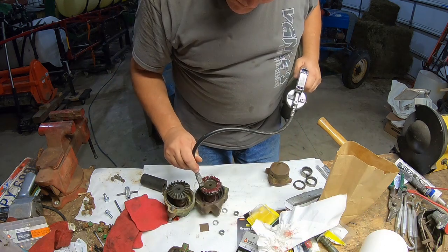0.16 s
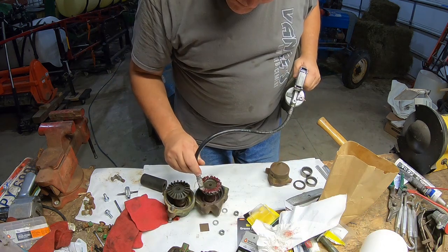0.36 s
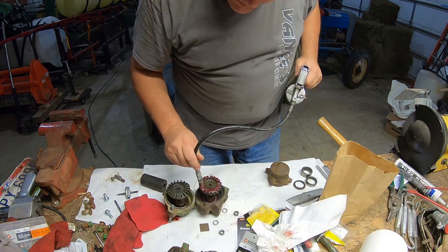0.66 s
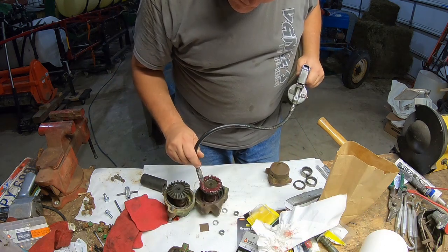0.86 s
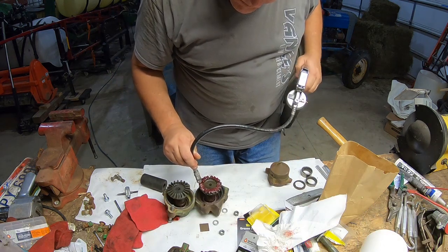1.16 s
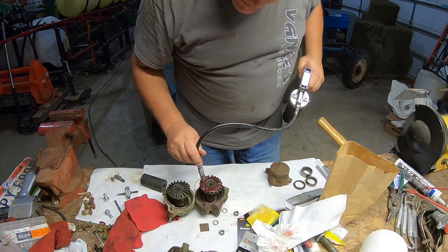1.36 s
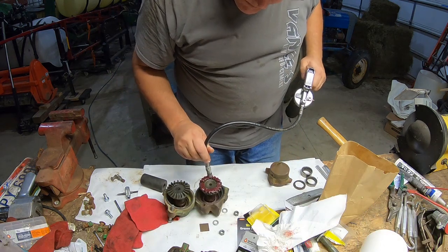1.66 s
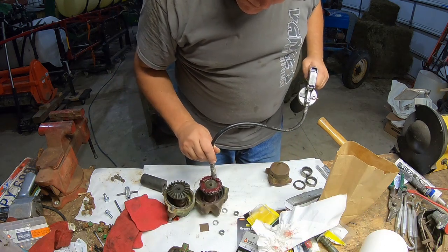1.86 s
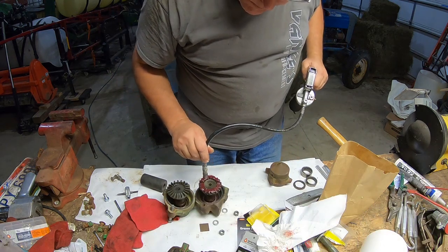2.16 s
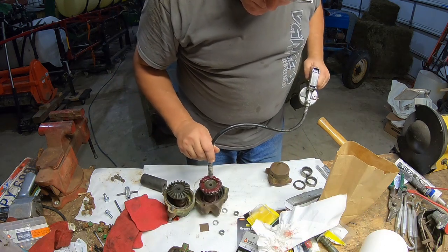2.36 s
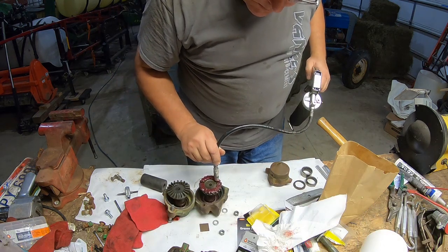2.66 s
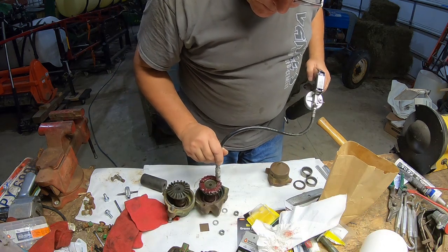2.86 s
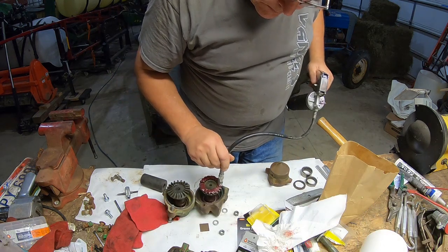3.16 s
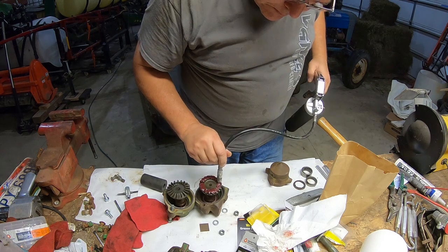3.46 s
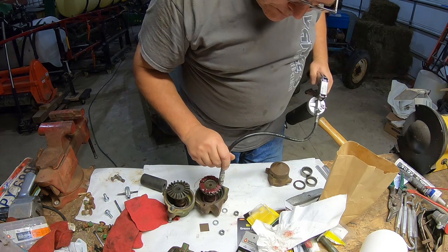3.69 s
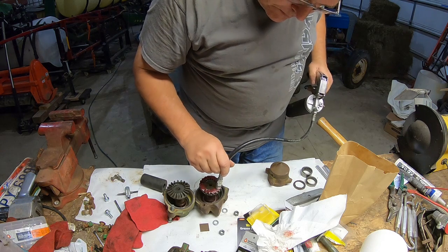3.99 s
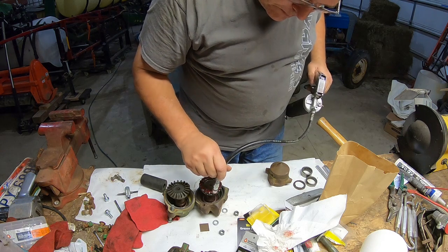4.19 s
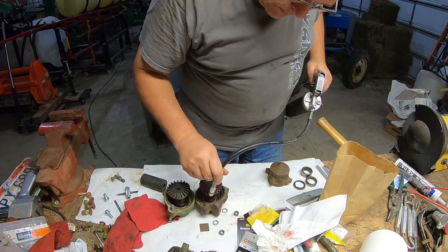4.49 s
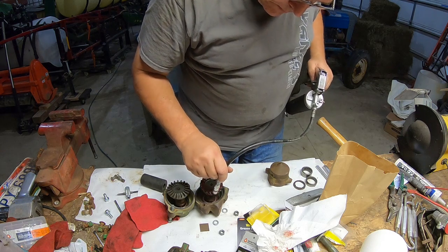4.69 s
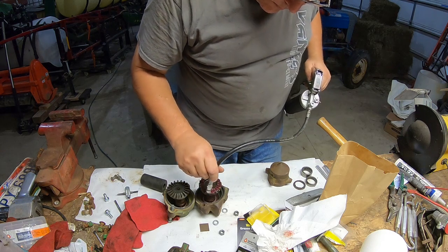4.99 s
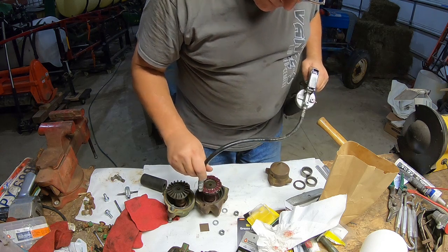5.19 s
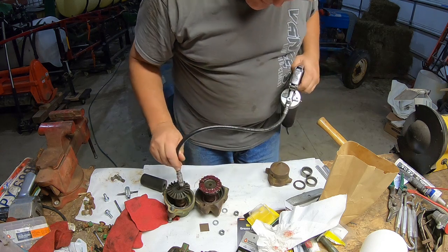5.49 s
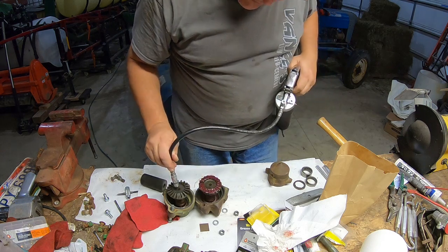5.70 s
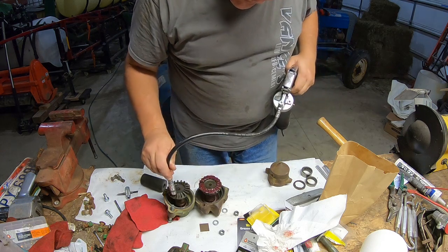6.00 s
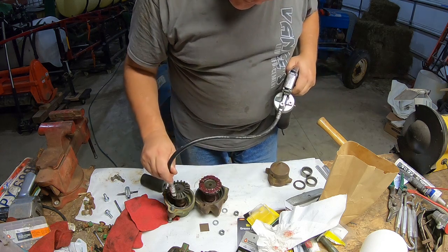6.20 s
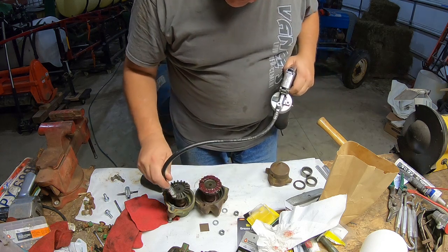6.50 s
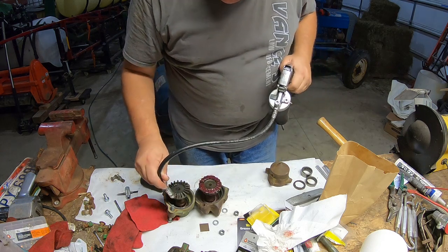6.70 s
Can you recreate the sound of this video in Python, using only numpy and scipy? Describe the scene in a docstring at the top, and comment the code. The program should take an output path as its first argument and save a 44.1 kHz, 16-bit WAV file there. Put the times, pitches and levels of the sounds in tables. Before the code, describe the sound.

A hand grease gun is worked in short strokes, its metal lever scraping, juddering and squeaking brightly, over quiet room rumble and a growing engine tone.

```python
"""A hand grease gun is pumped in a workshop: its steel lever and plunger scrape, judder and slip in short strokes.
Rough friction noise, broken into slips, rings the barrel, spring, head, lever and rod through bending resonances.
Small snaps, squeaks, ticks, thumps and a thin hiss join in. Two unsteady low tones and a growl make an engine
outside, over the room's quiet hiss and rumble of filtered noise. Two microphone ports listen."""
import sys
import numpy as np
from scipy import signal
from scipy.fft import rfft, irfft, next_fast_len
from scipy.io import wavfile
from scipy.ndimage import uniform_filter1d, map_coordinates

SR = 44100
rng = np.random.default_rng(int(sys.argv[2]) if len(sys.argv) > 2 else 0)


def wav_out(sig):
    """Save sig, one row per channel (or a flat mono array), as 16-bit PCM at SR to the path in sys.argv[1]."""
    wavfile.write(sys.argv[1], SR, np.round(np.clip(np.atleast_2d(sig).T, -1, 1) * 32767).astype(np.int16))


N = 302085  # length in samples
T = np.arange(N) / SR  # time in seconds


def amp(db):
    """Gain of a level in dB."""
    return 10 ** (np.asarray(db) / 20)


def unit(x):
    """x scaled to an rms of 1."""
    return x / np.sqrt(np.mean(np.abs(x) ** 2) + 1e-20)


def noise(size=N):
    """Two unrelated channels of white noise."""
    return rng.standard_normal((2, size))


def along(points, hz):
    """Read (pitch_hz, value) points at any pitch, on a log axis."""
    point_hz, values = np.transpose(points)
    return np.interp(np.log(hz + 1), np.log(point_hz + 1), values)


def curves(rows, t=T):
    """Draw straight lines over time through each column after the first, which holds the times."""
    times, *columns = np.transpose(rows)
    return np.array([np.interp(t, times, column) for column in columns])


def wobble(rate, size=N):
    """A smooth random curve with about rate random points a second."""
    knots = rng.standard_normal(int(size * rate / SR) + 4)
    return map_coordinates(knots, [np.arange(size) * rate / SR])


def filtered(x, response):
    """Multiply the spectrum of x by a response, given as a function of frequency."""
    padded = next_fast_len(N + SR // 2)
    hz = np.fft.rfftfreq(padded, 1 / SR)
    return irfft(rfft(x, padded) * response(hz), padded)[..., :N]


def resonances(modes):
    """Response of fixed resonances (pitch_hz, width_hz, level_db), scaled so white noise keeps its level."""
    def response(f):
        total = 0
        for k, (hz, width, db) in enumerate(modes):
            peak = 1j * f * width / (hz * hz - f * f + 1j * f * width)
            total = total + (-1) ** k * amp(db) * peak  # alternate signs
        return unit(total)
    return response


def moving(x, hz, width_hz):
    """A resonance whose pitch follows hz: shift down, one pole, shift back; white noise keeps its level."""
    turn = np.exp(2j * np.pi * np.cumsum(hz) / SR)
    pole = np.exp(-np.pi * width_hz / SR)
    return np.real(turn * signal.lfilter([np.sqrt(2 - 2 * pole ** 2)], [1, -pole], x / turn))


def ports(pair, alike):
    """Mix two unrelated signals to left and right so that they share the given likeness at each pitch."""
    def shares(hz):
        angle = np.arccos(np.clip(along(alike, hz), -1, 1)) / 2
        return np.array([np.cos(angle), np.sin(angle)])
    mid, side = filtered(pair, shares)
    return np.array([mid + side, mid - side])


def burst(size, rise, t60):
    """Force of one slip: a quick rise, then a decay (60 dB in t60 seconds) as the metal grips again."""
    t = np.arange(size) / SR
    return (1 - np.exp(-t / rise)) * amp(-60 * t / t60)


# Tone colour of the hiss: pitch_hz, relative level_db (per Hz)
HISS_COLOUR = [(180, -49), (300, -7), (535, -12.5), (1160, -15.5), (2040, -15.5), (15500, -40)]
# Tone colour of the low rumble: pitch_hz, relative level_db (per Hz)
RUMBLE_COLOUR = [(15, -49), (25, -3.5), (76, -8.5), (184, 0), (241, -6), (420, -18), (550, -41.5),
                 (920, -120)]
# How alike the background is at the two ports: pitch_hz, likeness (-1 to 1)
ROOM_LIKENESS = [(60, 0.22), (130, 0.61), (290, -0.74), (640, -0.61), (3100, 0.52), (6000, 0.045)]


def room():
    """The workshop's steady hiss over a lumpy rumble, both coloured noise whose level sways at random."""
    def layer(colour):
        coloured = filtered(noise(), lambda hz: amp(along(colour, hz)))
        return unit(ports(coloured, ROOM_LIKENESS))
    hiss = amp(-61.5 + 1 * wobble(1.86)) * layer(HISS_COLOUR)
    rumble_db = -56.0 + .6 * wobble(2.99) + 3.83 * wobble(10)  # slow sway plus quicker lumps
    rumble = amp(rumble_db) * layer(RUMBLE_COLOUR) * amp([[-.9], [.9]])  # a little louder on the right
    return hiss + rumble


# Swells of the lower engine tone: time_s, level_db (a random sway is added)
BOOM = [(0, -75.5), (2.1, -60.5), (2.28, -59), (3.67, -49.5), (3.73, -36), (3.79, -68), (3.89, -44),
        (4.65, -36.5), (4.73, -55), (5.29, -32), (5.49, -35), (5.54, -47), (6.12, -32.5), (6.28, -60.5),
        (6.36, -29), (6.5, -49), (6.66, -33.5), (6.85, -40)]
# The higher engine tone: time_s, pitch_hz (a random drift is added), level_db
DRONE_TONE = [(2.5, 96.7, -59), (4.5, 96.8, -54), (5.3, 101, -42), (5.7, 108.9, -48), (6.1, 108.3, -39),
              (6.25, 114.9, -50.5), (6.37, 116.6, -43), (6.66, 116.8, -35.5), (6.85, 113.7, -50)]


def engine():
    """Two unsteady low tones, each blurred by noise around its pitch, over a wide growl that follows the boom."""
    boom_db, = curves(BOOM)
    drone_hz, drone_db = curves(DRONE_TONE)
    boom_tone = (boom_db + 2 * wobble(8.6), 74, 1.5, .5)  # level dB, pitch Hz, drift Hz, blur
    drone_tone = (drone_db, drone_hz, 2.5, .8)
    tones = np.zeros((2, N))
    for db, hz, drift_hz, blur in [boom_tone, drone_tone]:
        carrier = np.exp(2j * np.pi * np.cumsum(hz + drift_hz * wobble(8.3)) / SR)
        shared = 1 + blur * (wobble(19) + 1j * wobble(28))
        own = .24 * np.array([wobble(25) + 1j * wobble(30) for _ in tones])  # differs between ports
        tones += amp(db) * unit(np.real(carrier * (shared + own)))
    growl_modes = [(50, 25, 0), (105, 50, -3), (190, 90, -5), (750, 700, -17)]
    growl = filtered(noise(), lambda f: unit(resonances(growl_modes)(f) ** 2))
    growl_gain = amp(-11.0) * uniform_filter1d(amp(boom_db), SR)  # the boom's level averaged over 1 s
    return tones * amp([[.4], [-.4]]) + growl_gain * ports(growl, ROOM_LIKENESS)


# Dull low bumps: start_s, level_db, pitch_hz
BUMPS = [(0.732, -48, 244), (1.367, -40, 78.5)]


def thumps():
    """Each bump is a short soft swell of a few low cycles."""
    cycles = 4.6
    out = np.zeros(N)
    for s, db, hz in BUMPS:
        progress = np.clip((T - s) * hz / cycles, 0, 1)
        out += amp(db) * np.sin(np.pi * progress) ** 2 * np.sin(2 * np.pi * hz * (T - s))
    return out


# Thin hiss near the barrel's pitch: time_s, level_db (a random sway is added)
SEEP_LEVEL = [(1.1, -69), (1.26, -60.5), (5.6, -71), (5.7, -65), (6.1, -71), (6.22, -89)]


def seep():
    """A thin hiss whose level rises and falls: noise through two wide resonances, applied twice."""
    modes = [(5800, 600, 0), (3800, 2400, -10)]
    hiss = filtered(noise(), lambda f: unit(resonances(modes)(f) ** 2))
    return amp(curves(SEEP_LEVEL)[0] + 1.5 * wobble(14)) * ports(hiss, [(5800, 0.52)])


# How long the room rings: pitch_hz, t60_s (time to fade by 60 dB)
WALL_DECAY = [(1000, 0.31), (5000, 0.14), (12000, 0.26)]


def walls(x):
    """The room's answer: noise in which each frequency dies at its own speed, starting 200 samples late."""
    hz, t, z = signal.stft(noise(SR // 2), SR, nperseg=256)
    decay = amp(-60 * t / along(WALL_DECAY, hz)[:, None])
    tail = signal.istft(z * decay, SR, nperseg=256)[1]
    late = np.pad(x, ((0, 0), (200, 0)))
    return signal.fftconvolve(late, tail / np.linalg.norm(tail[0]), axes=1)[:, :N]


# The nozzle touches the gear: start_s, level_db (before the click is shaped), pitch_hz (centre)
TOUCHES = [(2.0383, -36, 2800), (4.66, -45, 2000), (5.1597, -53, 2000), (5.276, -51, 4500),
           (5.649, -39, 3500), (6.3476, -49.5, 2200)]


def ticks():
    """Each touch is a short broad click: a noise burst through two equal resonances around its own pitch."""
    size = 600
    out = np.zeros((2, N))
    for s, db, hz in TOUCHES:
        pitch, width_hz = np.full(size, hz), 0.92 * hz
        click = amp(db - 5) * burst(size, rise=.0002, t60=0.012) * noise(size)
        out[:, round(s * SR):][:, :size] += moving(moving(click, pitch, width_hz), pitch, width_hz)
    return out


# Tiny squeaks: start_s, length_s, from_hz, to_hz, level_db (of the pure tone, before noise is added)
SEAL_SQUEAKS = [(6.14, .045, 5650, 5300, -66), (6.175, .025, 5900, 5700, -64),
                (3.35, .03, 7750, 7500, -47.5), (3.33, .055, 1830, 1600, -59), (2.57, .04, 1950, 1870, -58),
                (.94, .085, 2020, 1850, -59)]


def squeaks():
    """Narrow falling whistles of the greasy seal: a gliding tone mixed with noise around the same pitch."""
    out = np.zeros((2, N))
    for s, length, from_hz, to_hz, db in SEAL_SQUEAKS:
        a = round(s * SR)
        progress = np.linspace(0, 1, round(length * SR))
        size = len(progress)
        hz = from_hz + (to_hz - from_hz) * progress
        tone = np.sin(2 * np.pi * np.cumsum(hz) / SR)
        blur = moving(noise(SR // 8)[:, :size], hz, width_hz=70)
        out[:, a:a + size] += amp(db) * np.sin(np.pi * progress) * (tone + 1.34 * blur)
    return out


# Single slips: start_s, level_db (each part adds its own offset)
SINGLE_SLIPS = [(0.556, -38.5), (0.6627, -42), (0.685, -38.5), (0.717, -41.5), (0.7342, -41), (0.75, -53),
                (1.27, -39), (1.305, -36), (1.3352, -41), (1.437, -38), (1.5725, -38), (1.94, -33),
                (1.962, -42), (1.983, -33.5), (2.024, -40.5), (2.0514, -33.5), (2.064, -46), (2.084, -41),
                (2.117, -34), (2.1689, -40), (2.179, -33.5), (2.234, -40), (2.2552, -38.5), (2.2636, -39),
                (2.279, -39.5), (2.2952, -35), (2.3274, -38), (2.3463, -36), (2.3608, -39.5), (4.087, -39),
                (4.099, -38.5), (4.1125, -40.5), (4.124, -39), (4.145, -36.5), (4.2332, -43),
                (4.3069, -38.5), (4.321, -39), (4.4203, -42.5), (4.52, -43.5), (4.603, -35.5), (4.621, -37),
                (4.633, -40), (4.733, -40.5), (4.7415, -37.5), (4.761, -38.5), (4.7823, -39), (4.795, -38),
                (4.8162, -38), (4.8332, -40), (4.8914, -35.5), (4.9059, -39), (4.9512, -41),
                (4.9788, -36.5), (5.003, -41), (5.085, -42), (5.0958, -35), (6.281, -66), (6.334, -57),
                (6.394, -56.5), (6.441, -58), (6.497, -51)]


def crack(rough):
    """The dry snap as each single slip breaks free: a very short noise burst through two wide resonances."""
    kicks = np.zeros(N)
    s, db = np.transpose(SINGLE_SLIPS)
    kicks[np.round(s * SR).astype(int)] = amp(db + 1.0)
    snap = np.convolve(kicks, burst(size=400, rise=0.000082, t60=0.0048))[:N] * rough
    modes = [(2000, 1600, -6), (5300, 3400, 0)]
    return filtered(snap, lambda f: unit(resonances(modes)(f) ** 2))


# How much a single slip rings the lower parts: time_s, spring_db, lever_db (added to the slip's level)
SLIP_SPREAD = [(.5, -19, -7), (1.3, -1, -8), (2.1, -12.5, -12.5), (4, -13, -3.5), (4.6, -6.5, -9)]


def slips():
    """Force of the single slips on each part: a kick at each start, stretched into a quick rise and decay."""
    kicks = np.zeros((7, N))
    scatter_db = rng.normal(0, 1.3, (len(SINGLE_SLIPS), 7))
    for (s, db), chance_db in zip(SINGLE_SLIPS, scatter_db):
        spring_db, lever_db = curves(SLIP_SPREAD, s)
        # barrel, spring, head, lever, rod, shell, sliding faces
        parts_db = np.array([.4, spring_db, -23, lever_db, -15, -1.5, -15])
        kicks[:, round(s * SR)] = amp(db + chance_db + parts_db)
    return signal.fftconvolve(kicks, burst(size=2000, rise=0.00075, t60=0.026)[None], axes=1)[:, :N]


# Squeezes of the lever: start_s, length_s, rise_s, level_db (before part offsets), fade_db, judder (0-1),
# slips_per_s (before random and fade changes), spring_db, lever_db, rod_db (added to level_db),
# barrel_hz, spring_hz, head_hz, rod_hz (at the start), bend_percent (as load builds)
LEVER_SQUEEZES = [(0, 0.2926, 0.1, -41.5, -3, 0.34, 43, -10, -30, -23.5, 5570, 3220, 2000, 4230, 0.8),
                  (0.28, 0.43, 0.095, -38, 11.5, 0.53, 64, -20.5, -30, -25, 5604, 3467, 1330, 4200, 3.1),
                  (1.328, 0.1, 0.026, -42, 0, 0.4, 160, -10, -18, -31, 5570, 3244, 1250, 4300, 0.69),
                  (1.475, 0.09, 0.011, -42, 1.5, 0.9, 59, -9, -19, -35, 5350, 3260, 1230, 4300, 0.6),
                  (1.575, 0.35, 0.031, -41.5, 1, 0.82, 73.5, -15, -19, -28, 5415, 3265, 1216, 4260, 3.3),
                  (2.81, 0.18, 0.029, -38, 3, 0.9, 125, -21, -25, -39, 5470, 3300, 1170, 4260, 0.92),
                  (2.986, 0.18, 0.11, -36.5, 1, 0.97, 98, -31, -19.5, -29, 5450, 3460, 1274, 4330, 6.3),
                  (3.578, 0.38, 0.012, -45, -0.5, 0.7, 85, -17.5, -8.5, -12, 5390, 3220, 1610, 4420, 5.8),
                  (3.963, 0.096, 0.0027, -45.5, 3.5, 1, 58, -12.5, -6, -12.5, 5750, 3270, 2010, 4450, 0.73),
                  (6.517, 0.34, 0.082, -41.5, 0.5, 0.94, 97, -16.5, -15, -17, 5430, 3254, 1510, 4180, 2.7)]
# The lever swinging back: start_s, length_s, slack_s, rise_s, level_db (before part offsets), fade_db,
# spring_db, rod_db (added to level_db), barrel_hz, rod_hz (at the start), bend_percent (over the swing)
LEVER_RETURNS = [(0.867, 0.27, 0.04, 0.051, -40.5, 5.5, -13.5, -16, 5520, 4250, 0),
                 (2.457, 0.23, 0.045, 0.081, -41.5, 2, -18.5, -12.5, 5650, 4250, -2),
                 (3.252, 0.27, 0.028, 0.028, -42.5, 7, -18.5, -10, 5840, 4580, -17.5),
                 (5.333, 0.32, 0.01, 0.062, -45, 2.5, -11, -10, 5440, 4190, 2)]
SQUEEZE_LEAD_DB, RETURN_LEAD_DB = 4, 11  # how far under its level a stroke starts to rise
SQUEEZE_HEAD_DB, RETURN_HEAD_DB, RETURN_LEVER_DB = -28, -36, -15  # added to the stroke's level
RETURN_JUDDER, RETURN_SLIPS_PER_S = 0.23, 150
RETURN_SPRING_HZ, RETURN_HEAD_HZ = 3353, 2240  # at the start of a swing back
SPRING_SAG, HEAD_SAG = 0.064, 0.23  # share of its pitch that each loses over a swing back
HEAD_BENDS, LEVER_BENDS = 3, .3  # bend of the head, and of lever and rod, over that of the barrel


def plan():
    """Every stroke in order: times, levels, judder, slips, four part levels, four ring pitches at start and end."""
    rows = []
    for (s, length, rise, db, fade_db, judder, rate, spring_db, lever_db, rod_db,
         hz, spring_hz, head_hz, rod_hz, bend) in LEVER_SQUEEZES:
        start = np.array([hz, spring_hz, head_hz, rod_hz])
        end = start * (1 + bend * .01 * np.array([1, 1, HEAD_BENDS, LEVER_BENDS]))
        parts_db = [spring_db, SQUEEZE_HEAD_DB, lever_db, rod_db]
        rows.append((s, length, 0, rise, db, SQUEEZE_LEAD_DB, fade_db, judder, rate, parts_db, start, end))
    for s, length, slack, rise, db, fade_db, spring_db, rod_db, hz, rod_hz, bend in LEVER_RETURNS:
        start = np.array([hz, RETURN_SPRING_HZ, RETURN_HEAD_HZ, rod_hz])
        end = start * (1 + np.array([bend * .01, -SPRING_SAG, -HEAD_SAG, bend * .01 * LEVER_BENDS]))
        parts_db = [spring_db, RETURN_HEAD_DB, RETURN_LEVER_DB, rod_db]
        rows.append((s, length, slack, rise, db, RETURN_LEAD_DB, fade_db,
                     RETURN_JUDDER, RETURN_SLIPS_PER_S, parts_db, start, end))
    return sorted(rows, key=lambda row: row[0])


REST_HZ, SETTLE_S = [5600, 3349, 1270, 4190], 0.049  # barrel, spring, head and rod with the lever still


def rings():
    """Pitch of barrel, spring, head and rod: bent through each stroke, back at rest in the longer pauses."""
    rows, points = plan(), []
    next_starts = [row[0] for row in rows[1:]] + [N / SR]
    for (s, length, *_, start, end), later in zip(rows, next_starts):
        points += [(s, *start), (min(s + length, later), *end)]
        if later - s - length > 4 * SETTLE_S:
            points += [(s + length + 2 * SETTLE_S, *REST_HZ), (later - SETTLE_S, *REST_HZ)]
    return curves(points)


# The swing briefly presses harder: start_s, length_s, rise_db (before each part takes its share)
PRESSES = [(2.535, 0.042, 5), (3.283, 0.043, 3), (5.371, 0.037, 6)]
# Random sway of each part (barrel, spring, head, lever, rod, shell, sliding faces): sway_db
PART_SWAY_DB = [1, 1.8, 3, 3, 3.5, 2, 1]
SLACK_DB = 30  # level under the peak before the lever bites
SPRING_FOLLOWS, HEAD_FOLLOWS, ROD_FOLLOWS = 0.12, 0.14, 0.34  # share of the barrel's swell in dB
STALL_JUDDER, STALL_SLOWS = 0.072, 0.0386  # per dB of fade the scrape breaks into more distinct, slower slips


def strokes():
    """Rubbing force on the seven parts: a steady scrape mixed with a train of uneven slips."""
    force = np.zeros((7, N))
    for s, length, slack, rise, db, lead_db, fade_db, judder, rate, parts_db, *_ in plan():
        spring_db, head_db, lever_db, rod_db = parts_db
        a, b = max(round(s * SR), 0), min(round((s + length) * SR), N)
        size = b - a
        t = T[a:b] - s
        faded_db = fade_db * np.clip((t - slack - rise) / (length - slack - rise), 0, 1)
        rising_db = -lead_db * np.clip(1 - (t - slack) / rise, 0, 1)
        swell_db = np.where(t < slack, -SLACK_DB, rising_db - faded_db)
        for at, span, up_db in PRESSES:
            swell_db += up_db * np.sin(np.pi * np.clip((T[a:b] - at) / span, 0, 1))
        # one slip each time the running count passes a whole number
        slip_rate = rate * amp(1.18 * wobble(30.2, size)) / (1 + STALL_SLOWS * faded_db)
        count = 1 + np.cumsum(slip_rate / SR)
        train = np.diff(np.floor(count), prepend=0) * amp(0.32 * wobble(189.6, size))
        train = unit(signal.fftconvolve(train, burst(size=1500, rise=0.00067, t60=0.062))[:size])
        share = np.clip(judder + STALL_JUDDER * faded_db, 0, 1)
        edges = np.clip(np.minimum(t / 0.0011, (length - t) / 0.018), 0, 1)  # quick start, softer end
        levels = db + np.array([
            swell_db - 3.0,  # barrel
            SPRING_FOLLOWS * swell_db + spring_db,
            HEAD_FOLLOWS * swell_db + head_db,
            swell_db + lever_db,
            ROD_FOLLOWS * swell_db + rod_db,
            swell_db - 5.0,  # shell
            swell_db - 10.0])  # sliding faces
        # the contact point moves, favouring other parts
        wander = np.array([sway_db * wobble(15.9, size) for sway_db in PART_SWAY_DB])
        force[:, a:b] += edges * amp(levels + wander) * unit(1 - share + share * train)
    return force


# Ring widths of barrel, spring and head: width_hz
MAIN_WIDTHS_HZ = [130, 58, 90]
# Resonances of the lever, before bending: pitch_hz, width_hz, level_db
LEVER_MODES = [(2590, 18, -13.5), (2791, 135, -2.5)]
# Resonances of the rod, before bending: pitch_hz, width_hz, level_db
ROD_MODES = [(4260, 120, 0), (4750, 260, -4.5)]
# Resonances of the barrel's shell, before bending: pitch_hz, width_hz, level_db (lowered by 6 dB when played)
SHELL_MODES = [(5340, 150, -2.5), (5930, 368, 7), (6278, 460, 6)]
# Tone colour of the broadband rasp of the sliding faces: pitch_hz, relative level_db (per Hz)
RASP_COLOUR = [(900, -23.5), (2000, 6), (4500, 11), (7600, 12.5), (10000, 0), (14300, -13)]
# The gun at the two ports: pitch_hz, likeness, phase_radians between ports, left_right_db
GUN_AT_PORTS = [(1026, .95, -3, -2.5), (2100, 1, -.1, -2.5), (4400, 1, 0, -1.5), (5000, 1, 1, 1.5),
                (6300, .8, .9, 1), (7100, .1, 0, 1), (8100, .5, -3.2, -1), (9300, .3, -4.8, 0)]
SHELL_BENDS, OVERTONE_BENDS = 0.77, 0.94  # powers of the barrel's bend
PITCH_SWAY = .006  # share of the pitch


def gun():
    """Rough friction force rings every part; the two ports hear it with their own level and phase."""
    force, bent = strokes() + slips(), rings()
    bent *= 1 + PITCH_SWAY * np.array([wobble(14) for _ in bent])  # the grip shifts and the rings waver
    rough = noise()
    barrel_bend, rod_bend = bent[0] / REST_HZ[0], bent[3] / REST_HZ[3]
    pair = np.zeros((2, N))
    for push, hz, width in zip(force, bent, MAIN_WIDTHS_HZ):  # barrel, spring, head
        pair += moving(push * rough, hz, width)
    for hz, width, db in LEVER_MODES:
        pair += amp(db) * moving(force[3] * rough, hz * barrel_bend ** LEVER_BENDS, width)
    for hz, width, db in ROD_MODES:
        pair += amp(db) * moving(force[4] * rough, hz * rod_bend, width)
    shell_push = force[5] * rough
    for k, (hz, width, db) in enumerate(SHELL_MODES):
        pair += (-1) ** k * amp(db - 6.0) * moving(shell_push, hz * barrel_bend ** SHELL_BENDS, width)
    # the barrel's overtone bends with it
    pair += amp(-11.0) * moving(shell_push, 7200 * barrel_bend ** OVERTONE_BENDS, width_hz=230)
    pair += filtered(force[6] * noise(), lambda hz: unit(amp(along(RASP_COLOUR, hz))))
    pair += crack(noise()) + squeaks() + ticks()
    alike, phase, balance = (np.array(GUN_AT_PORTS)[:, [0, k]] for k in range(1, 4))

    def port_gains(hz):
        left = amp(along(balance, hz) / 2) * np.exp(-.5j * along(phase, hz))
        return np.array([left, 1 / left])
    return filtered(ports(pair, alike), port_gains)


def scene():
    """The gun near the microphone, the room around it, the engine outside."""
    near = gun()
    return near + amp(-6.0) * walls(near) + seep() + engine() + room() + thumps()


def record(dry):
    """The treble is dulled, falls steeply above 14 kHz and is silent above top_hz."""
    top_hz = 15700
    treble = [(7700, 0.5), (8600, -4.0), (14300, -8.5), (15200, -31)]  # pitch Hz, level dB
    return filtered(dry, lambda hz: amp(along(treble, hz)) * (hz < top_hz))


dry = scene()
out = record(dry)
wav_out(out)
```